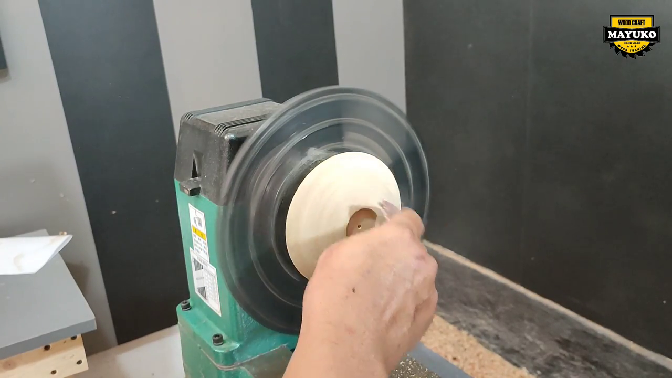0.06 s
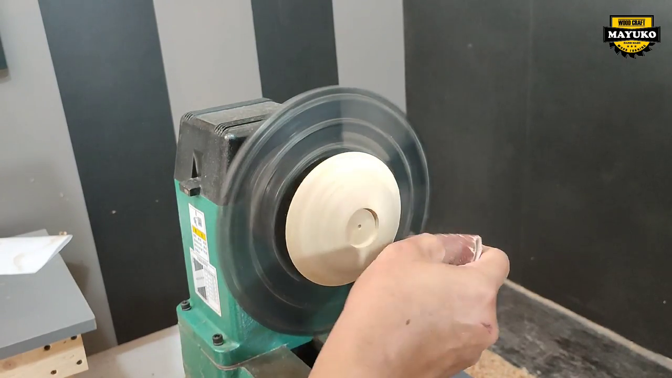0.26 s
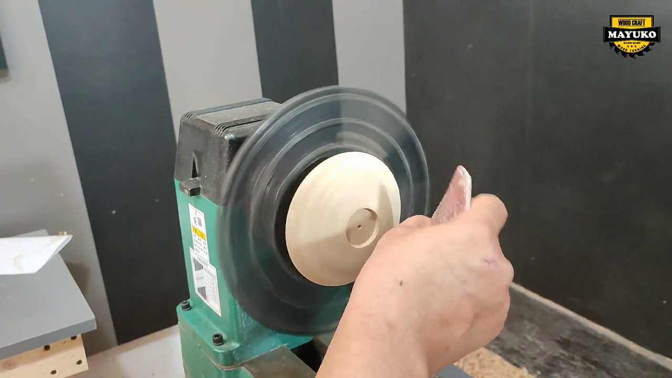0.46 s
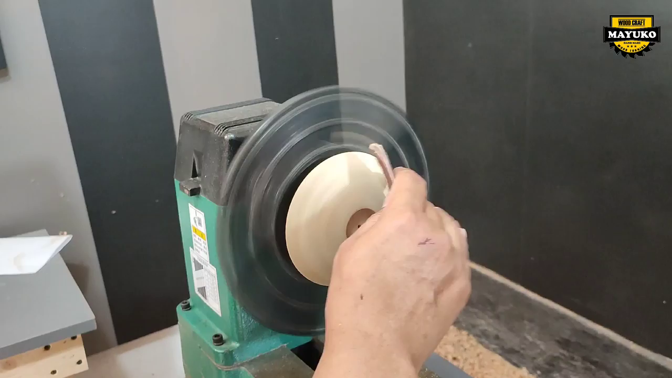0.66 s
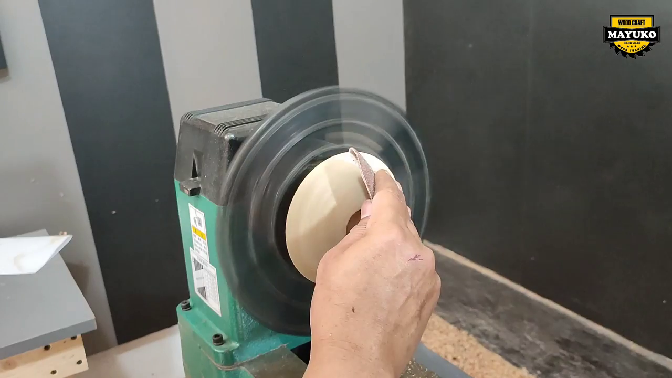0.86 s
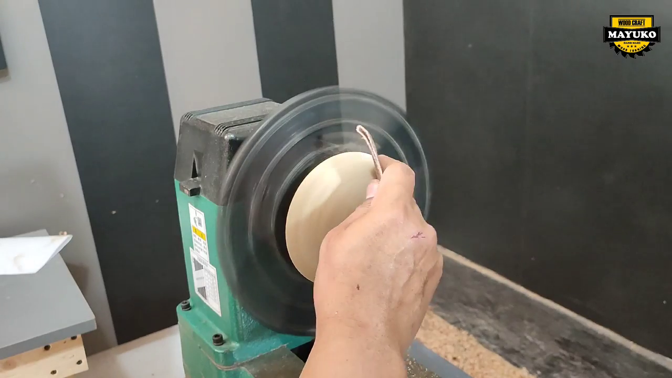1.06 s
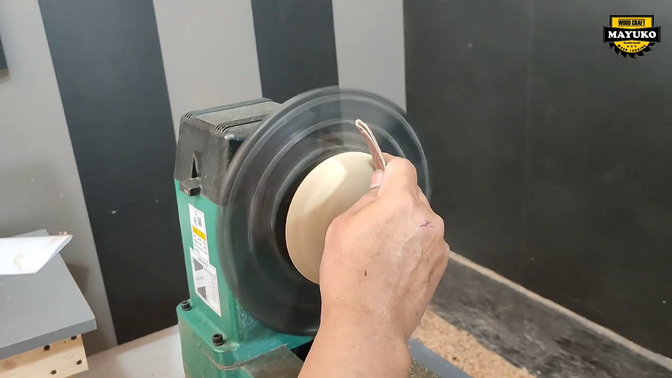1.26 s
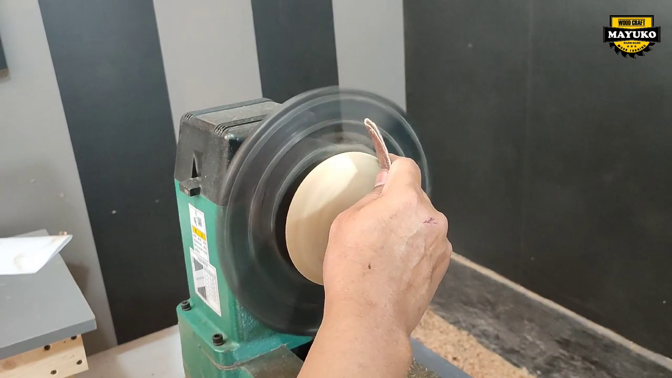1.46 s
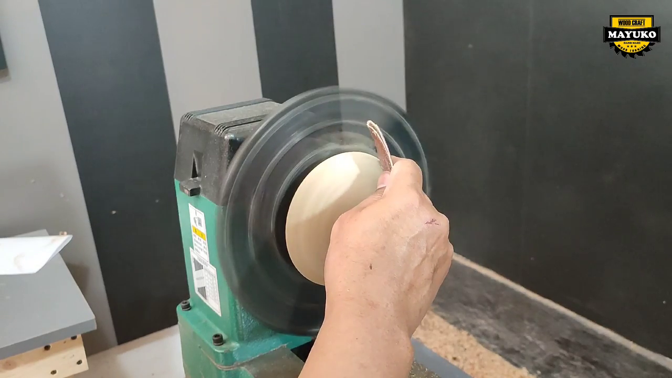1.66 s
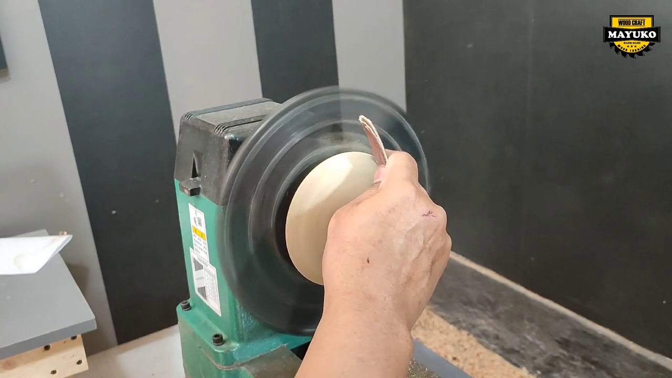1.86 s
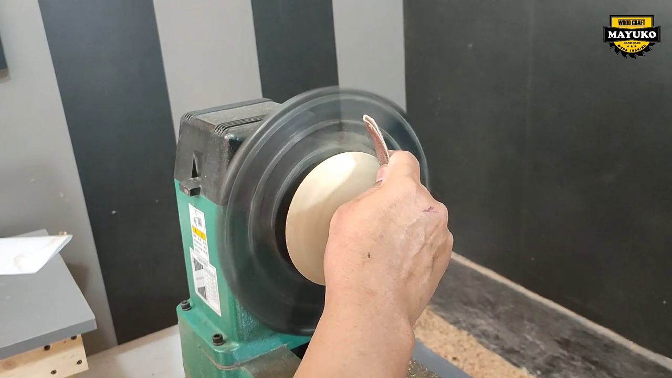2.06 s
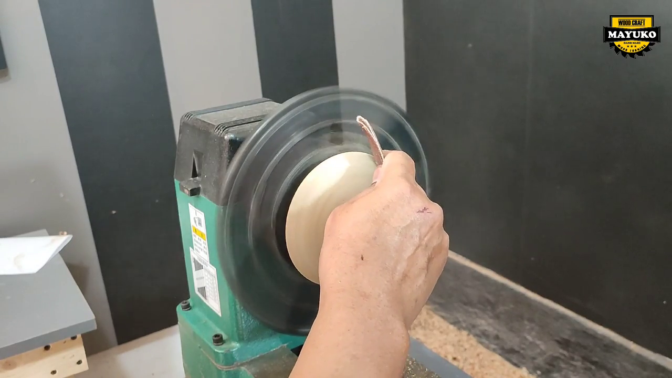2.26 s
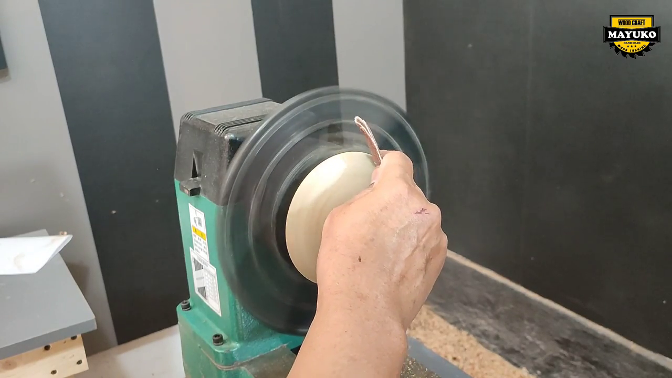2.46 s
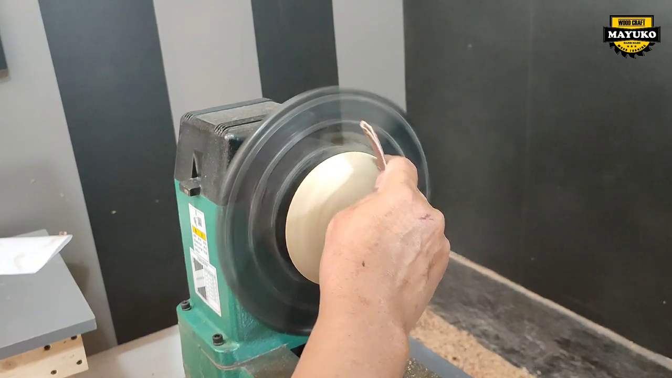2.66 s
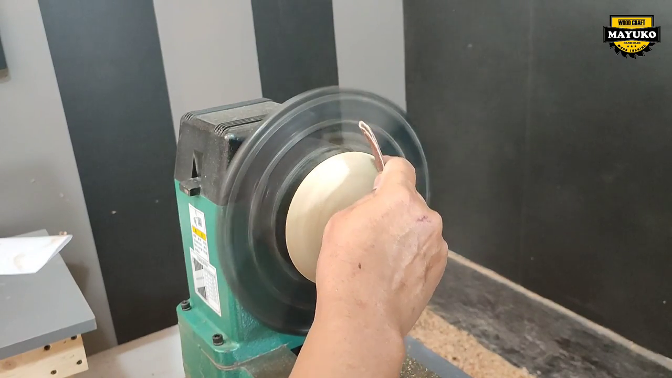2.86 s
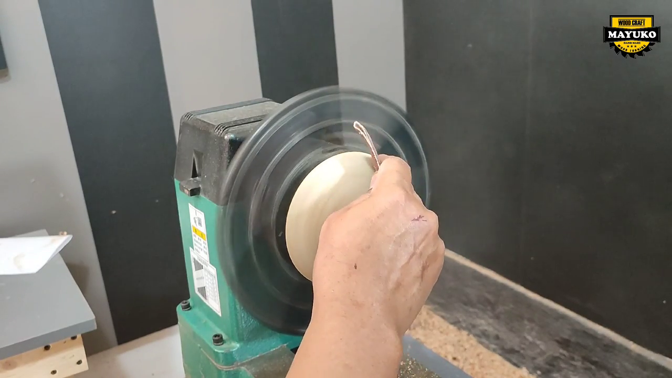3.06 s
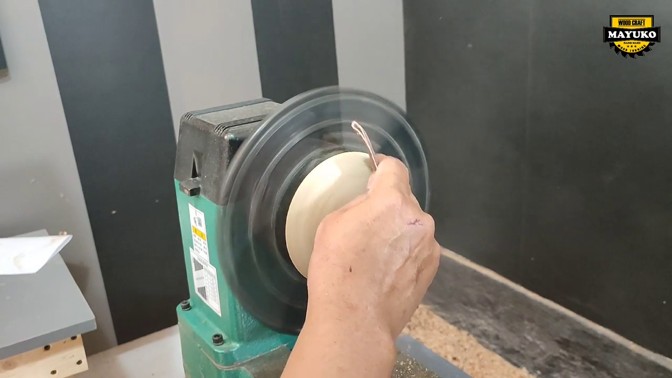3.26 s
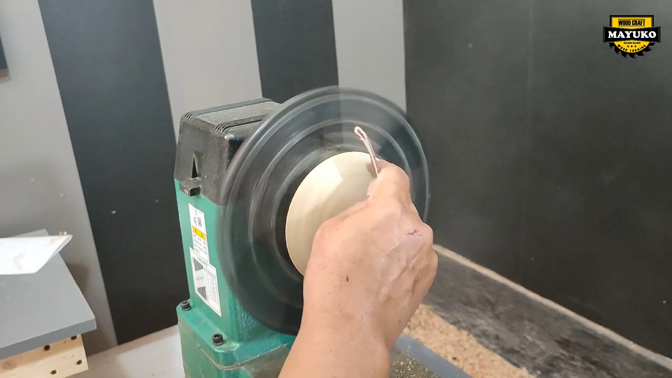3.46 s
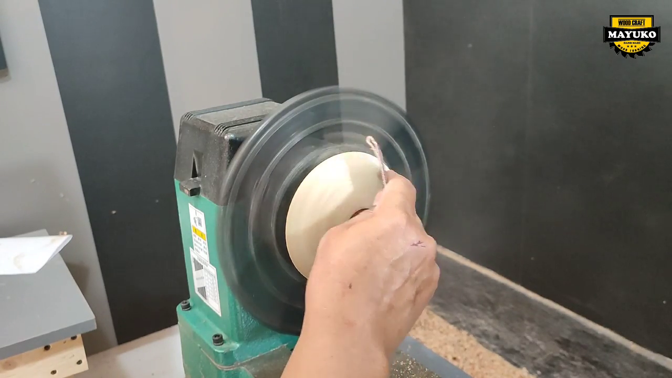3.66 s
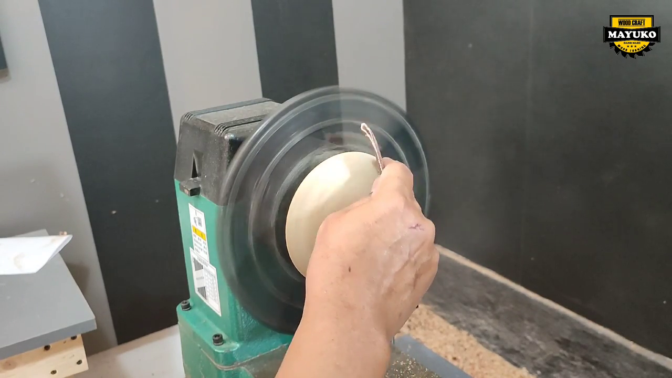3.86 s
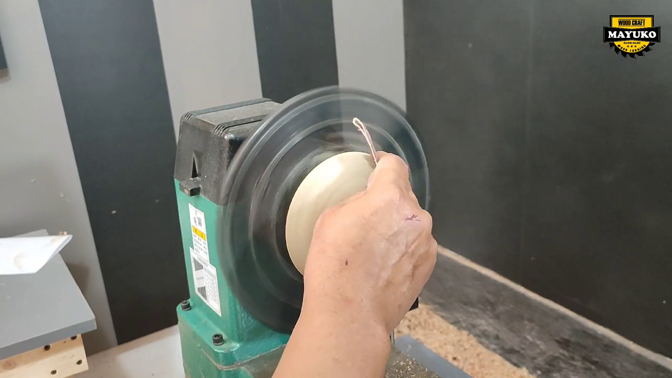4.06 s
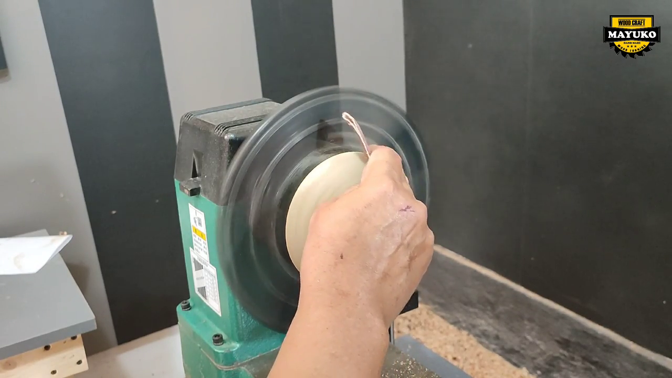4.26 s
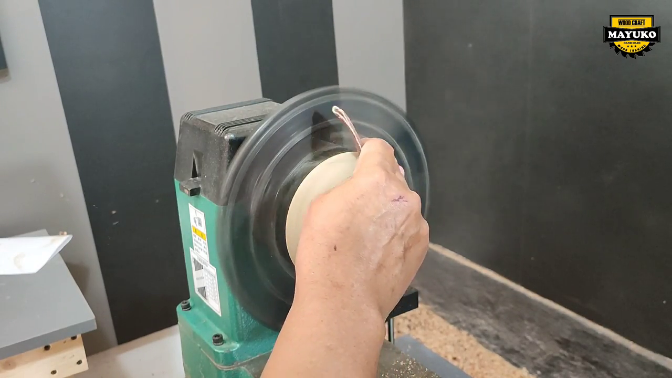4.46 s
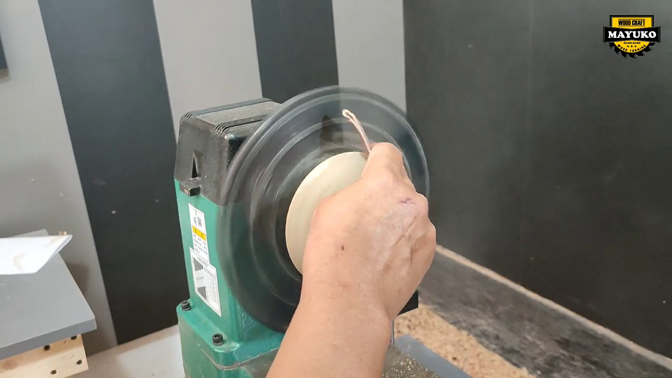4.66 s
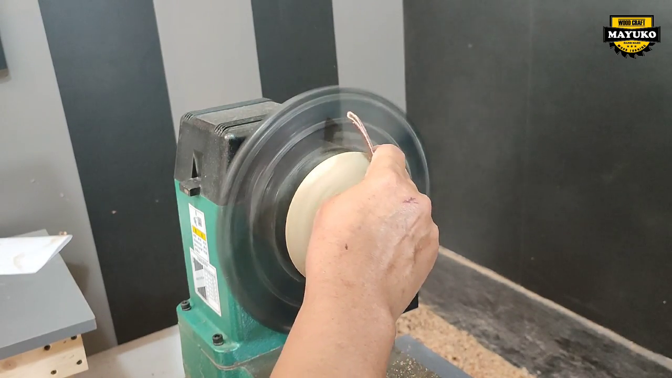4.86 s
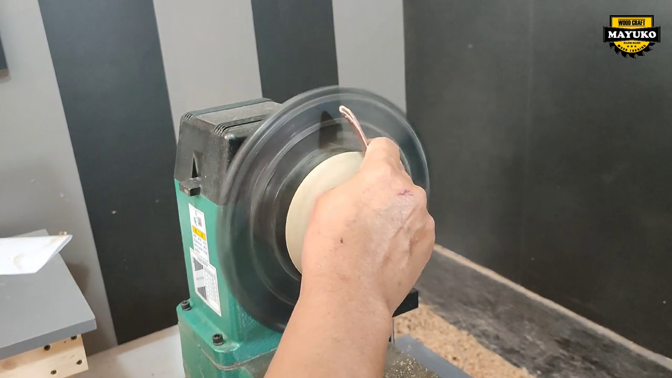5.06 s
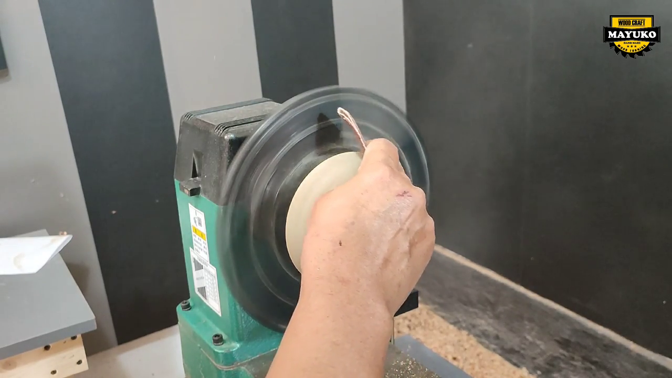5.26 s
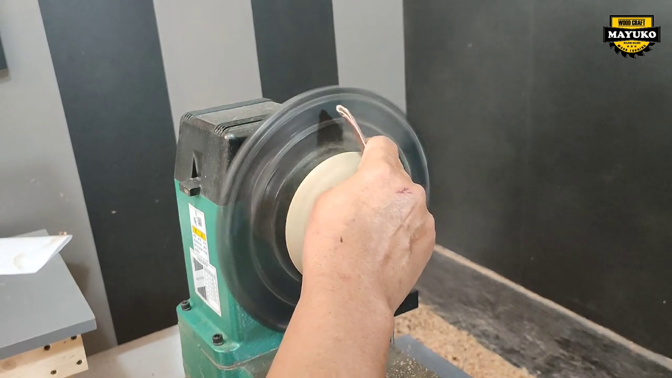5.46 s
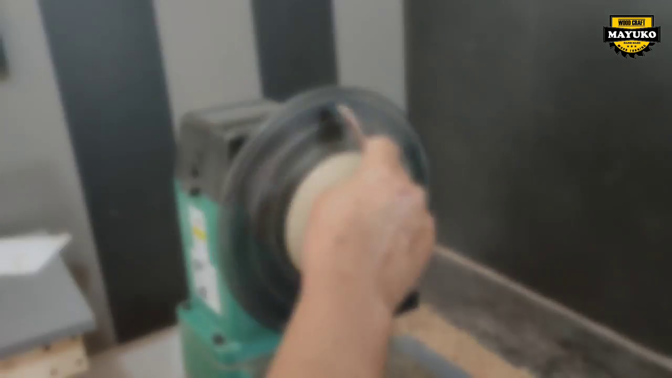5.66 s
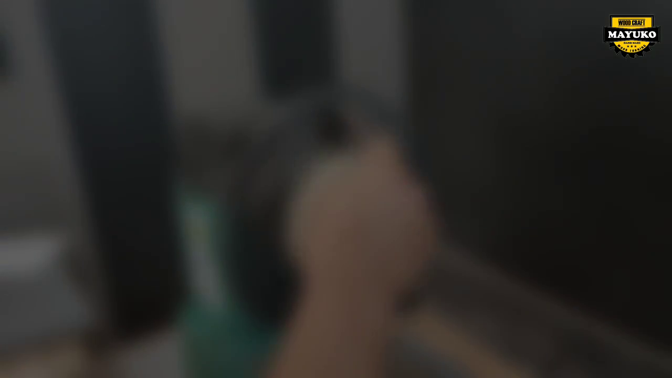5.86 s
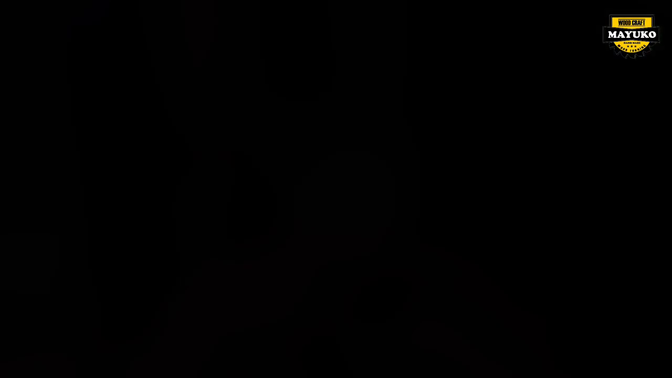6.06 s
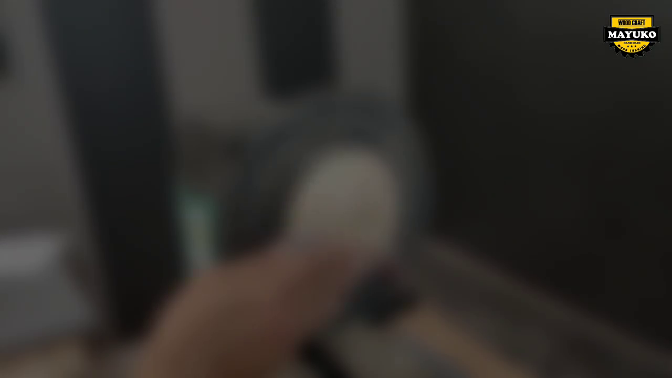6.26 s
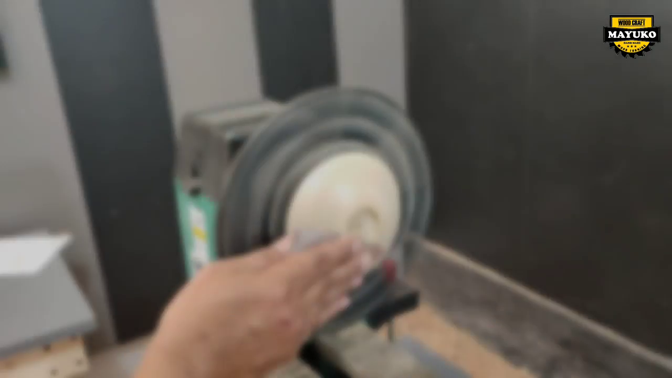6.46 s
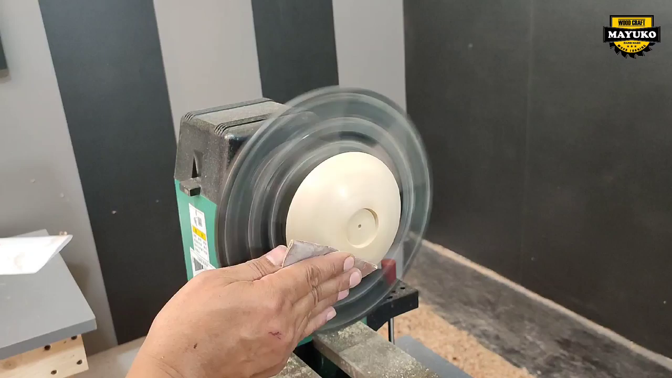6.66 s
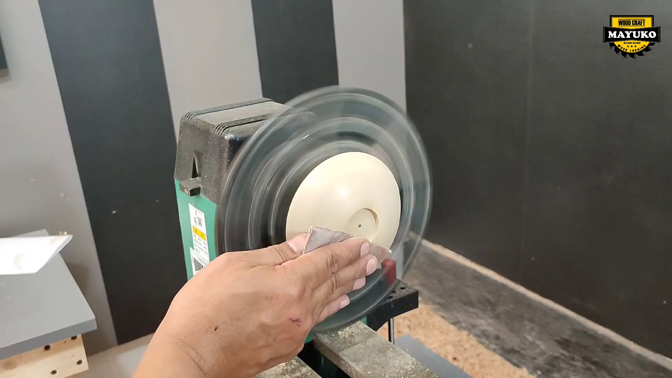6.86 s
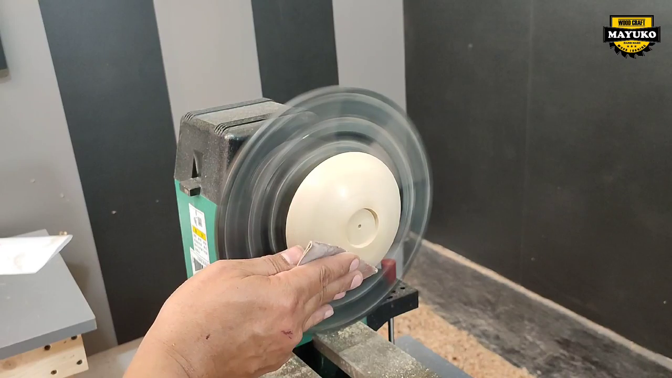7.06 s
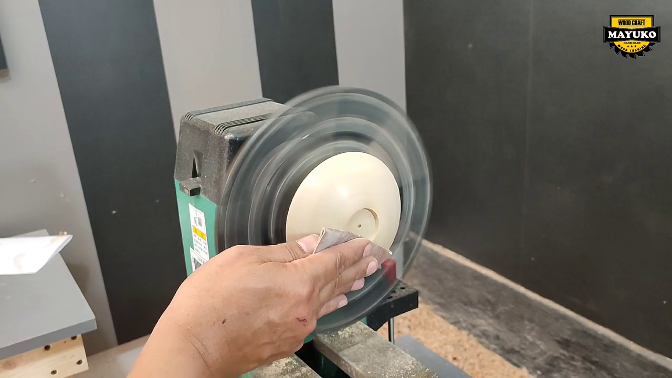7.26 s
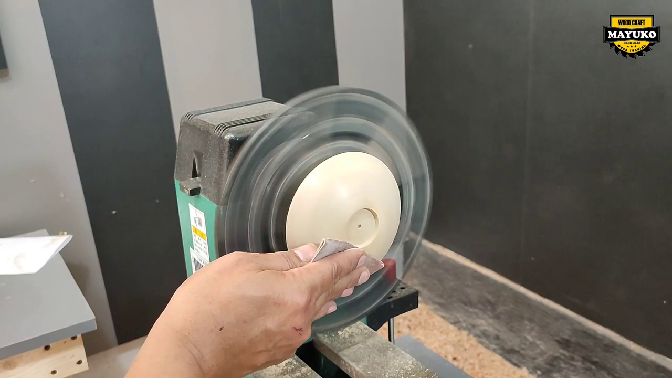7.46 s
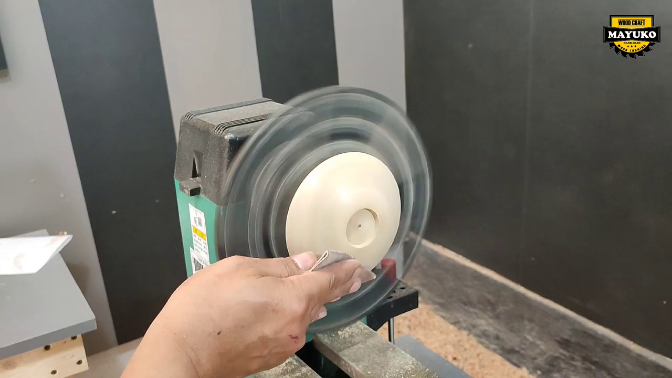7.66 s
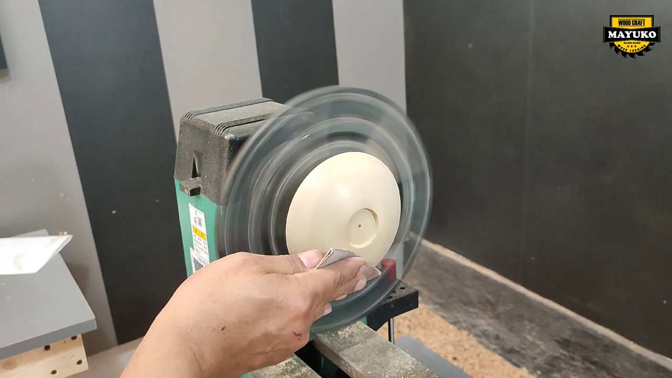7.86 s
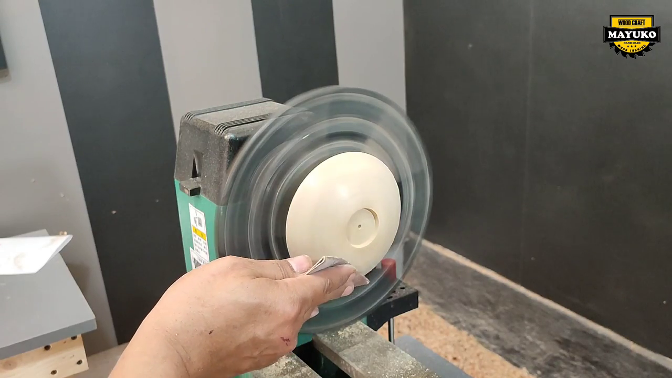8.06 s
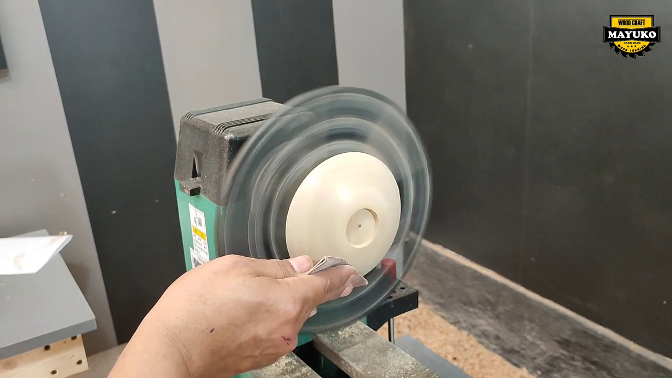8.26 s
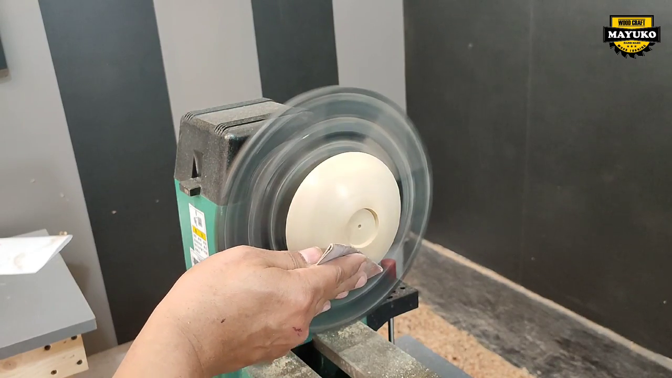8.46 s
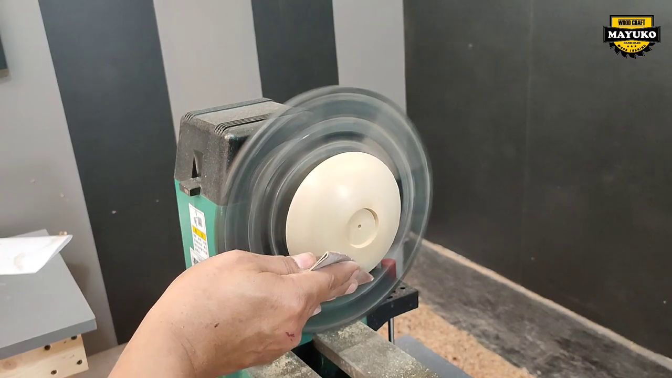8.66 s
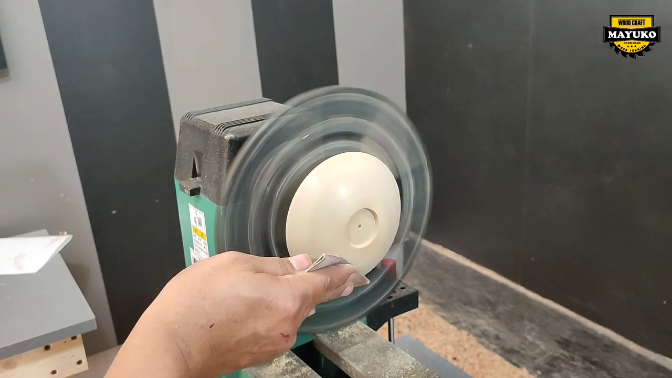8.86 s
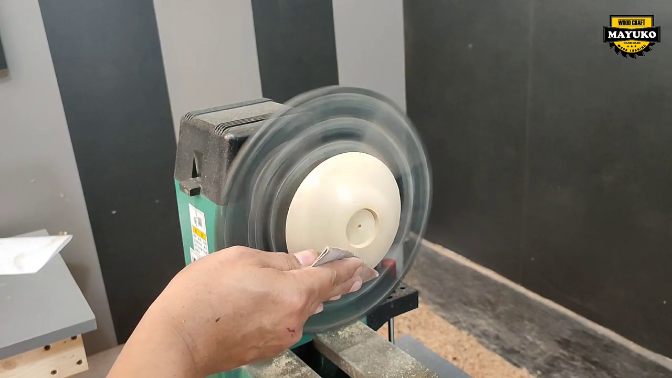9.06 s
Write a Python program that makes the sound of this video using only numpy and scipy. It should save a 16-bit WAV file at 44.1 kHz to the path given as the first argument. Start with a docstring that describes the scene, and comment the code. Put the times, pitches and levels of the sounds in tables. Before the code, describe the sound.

In a small workshop, a wood lathe hums and whirs steadily near the microphone. Coarse paper rasps brightly on the spinning bowl, lifts almost at once for about half a second, then bites again and stays on with a fast pulsing hiss and slight woody ringing. Past six seconds it cuts abruptly to a fine pad brushing very lightly, leaving the motor dominant.

```python
"""Gritty sanding hiss over a humming lathe: coarse paper leaves a spinning wooden bowl, returns and stays on.
After a hard cut a fine pad brushes the same bowl lightly; a small workshop answers, near a camera.
The sanding is noise shaped by the grit, pulsing with each turn, and also sent through two ringing bowl modes.
Motor and belt are steady and wavering tones plus a noisy whir; the draught is low, lumpy noise."""
import sys
import numpy as np
from scipy import signal
from scipy.fft import rfft, irfft, next_fast_len
from scipy.io import wavfile
from scipy.ndimage import uniform_filter1d

SR = 44100
rng = np.random.default_rng(int(sys.argv[2]) if len(sys.argv) > 2 else 0)


def put_to_file(sound):
    """Save the sound as 16-bit audio at rate SR, in the file named by the first command-line argument."""
    columns = np.atleast_2d(sound).T  # one column per channel
    safe = np.clip(columns, -1, 1)
    whole_steps = np.round(safe * 32767)
    wavfile.write(sys.argv[1], SR, whole_steps.astype(np.int16))


def attenuation_scalar(level_db):
    """Turn a level in dB into a linear amplitude multiplier (20 dB per decade)."""
    decades = np.asarray(level_db, float) / 20
    return 10 ** decades


N = 401306

SIZE = next_fast_len(N, True)
HZ = np.fft.rfftfreq(SIZE, 1 / SR)
T = np.arange(N) / SR

# Hiss of the coarse paper. Each row: frequency in Hz, relative level in dB per Hz.
COARSE_HISS = [(2060, -37), (3500, -3), (4720, -6), (5310, -2), (5730, -3), (7240, 1.5), (10600, -7),
               (12000, -4), (13700, -4.5), (14200, -9)]
# Lower skirt of the coarse hiss; it takes the place of the first row above. Each row: Hz, relative dB per Hz.
COARSE_HISS_LOW = [(300, -80), (900, -26), (1300, -36), (1700, -13), (2500, -10.5)]
# Hiss of the fine pad. Each row: frequency in Hz, relative level in dB per Hz.
FINE_HISS = [(300, -60), (900, -29), (1800, -12), (2500, -20), (3100, -7), (6200, -7), (7250, -2),
             (8400, -9.5), (14500, -8)]
# How the hand holds the coarse paper. Each row: time in seconds, pressure as hiss level in dB,
# ringing of the bowl against the hiss in dB, added to RING_DB.
HAND = [(0.0, -26, 8), (0.19, -29, 7), (0.84, -43.5, 18.5), (0.88, -33.5, 9), (0.92, -30.5, 1),
        (0.94, -26, -5.5), (1.25, -29, -0.5), (1.52, -27, 2), (1.68, -25, 2.5), (2.9, -25.5, 6.5),
        (3.05, -27, 6.5), (4.0, -27.5, 7.5), (4.7, -26, 5), (5.3, -26.5, 5), (6.14, -25.5, 5)]
# Ringing modes of the bowl. Each row: frequency in Hz, width in Hz, lag behind the hiss in radians,
# left over right in dB.
BOWL_MODES = [(1942, 79, 0.77, 2.5), (3096, 190, 1.36, -3)]
# End grain passing under the hand. Each row: times a turn, swing in dB, phase in radians.
END_GRAIN = [(1, 1.7, -2.3), (2, .9, 0)]
# How alike left and right are in the rubbing. Each row: frequency in Hz, likeness from -1 to 1.
RUB_LIKENESS = [(1400, -0.12), (1750, 0.57), (2200, 0.81), (3000, 0.14), (3600, 0.034), (5500, -0.12),
                (9000, 0.029), (14500, -0.032)]
# The camera body shades its microphone ports. Each row: frequency in Hz, left over right in dB.
RUB_BALANCE = [(1500, 4), (3500, -2), (7300, -1), (7900, -1.5), (8700, 6), (10000, -1.5), (14500, -1)]
# How fast the workshop echo dies. Each row: frequency in Hz, seconds to fall by 60 dB.
SHOP_DECAY = [(1000, 0.11), (2500, 0.38), (4500, 0.67), (7500, 0.49), (11000, 0.34), (14000, 0.33)]
# The echo is weakest around 2 kHz, where the bowl rings. Each row: frequency in Hz, returned level in dB.
SHOP_RETURN = [(1500, -2), (2200, -4), (3200, -1), (5000, -0.4)]
# Harmonics of the magnetic pull. Each row: multiple of MAINS_HZ, level in dB, left over right in dB,
# radians by which left leads.
MAINS_TONES = [(1, -58.5, -1, 0), (2, -61.5, 5, 0.4), (3, -74, 9, 2.5), (4, -50, -4, 0.5),
               (5, -64, 14, 1.7), (6, -76, 10, 2), (7, -55.5, -2, 0.3)]
# Tones in step with the motor. Each row: multiple of ROTOR_HZ, level in dB, left over right in dB,
# radians by which left leads.
ROTOR_TONES = [(5, -67, 0, 0), (8, -60, 1, .2), (10, -66, 0, .2), (11, -68, 0, .3), (12, -68, 0, .4),
               (13, -57, 3, .5), (19, -62, 7, .2), (20, -65, 2, .2), (22, -62, 7, -1.8),
               (23, -64, -10, 1.2), (24, -62, 2, 1.9), (25, -58, 6, -.5), (26, -61, 8, -1),
               (27, -57, 12, -2.6), (28, -61, 5, .4), (29, -67, 10, .5), (30, -69, 5, .8),
               (31, -69, 5, 1.3), (32, -69, 3, 1), (33, -68, 3, 1), (34, -69, 3, 1), (44, -67, 7, 1.7),
               (46, -69, 1, .9)]
# Spindle, belt and bearing tones. Each row: frequency in Hz before any slowing, level in dB,
# steady share of the power from 0 to 1, left over right in dB, radians by which left leads.
DRIVE_TONES = [(29.7, -62, .6, 15, 2), (60, -69, .4, 12, -.6), (217, -68, .3, 1, 0), (231, -64, .3, 0, -.1),
               (332.2, -50, .75, 4, .6), (346.5, -52, .7, -2, .3), (351, -53.5, .3, -2, .3),
               (360, -64, .6, 4, 0), (370.6, -63, .5, 6, .1), (383, -66, .2, 1, .1),
               (442.6, -58, .7, 2, .6), (513, -63, .3, 2, .8), (676, -61, .5, 10, -2), (978, -70, .3, 1, 1),
               (1216, -65, .6, 7, -1.1), (1231, -68, .6, 5, -1.3), (1333, -69, .4, 3, 0),
               (1479, -65, .5, 10, -.8)]
# Whir of fan and bearings. Each row: frequency in Hz, level in dB per Hz.
WHIR = [(40, -84), (100, -83.5), (220, -79.5), (340, -79.5), (420, -79), (550, -77.5), (800, -82.5),
        (1500, -80.5), (2100, -88.5), (3500, -98.5), (5000, -99), (8000, -106), (14500, -112)]
# How alike left and right are in the whir. Each row: frequency in Hz, likeness from -1 to 1.
WHIR_LIKENESS = [(60, .85), (200, .9), (450, .75), (800, .35), (1500, .2), (3500, .15), (6000, -.05)]
# The motor housing rings in the whir. Each row: frequency in Hz, width in Hz, peak in dB per Hz.
HOUSING = [(2470, 64, -80), (2980, 140, -87)]

LIFT_S, PRESS_S, CUT_S = 0.19, 0.84, 6.1352  # paper leaves, paper returns, fine pad takes over
PAD_DB, PAD_RING_DB = -50.5, -12  # the fine pad's hiss, and the bowl's ringing against it, added to RING_DB
PAD_EASES_S, PAD_EASES_DB = 7.8, -1.0  # when the pad's level steps, and by how much
SPIN_HZ = 29.88  # bowl turns a second
RING_DB = (-22, -19)  # each bowl mode against the hiss, before what the hand or pad adds
RING_GRAIN = 1  # extra share of the end-grain swing that the ringing gets
RING_WAVER_DB, RING_WAVER_HZ = 2, 11  # the contact spot creeps over the nodes of each mode
MAINS_HZ = 100.07  # magnetic pull, twice the supply
ROTOR_HZ = 24.83  # motor turns a second, before any slowing
ROTOR_BLUR_HZ, ROTOR_STEADY = 4.5, .2  # blur of the rotor tones and the steady share of their power
DRIVE_BLUR_HZ = 3.5
SAG = .0022  # share of speed lost throughout the coarse sanding part
DRAUGHT_DB, DRAUGHT_PRESSED_DB, DRAUGHT_LAG_S = -58.0, 7.0, .8  # base level, rise, time to rise
GUST_DB, GUST_HZ = 2, 3.4
EDGE_HZ = 14270  # upper limit of the band


def evened(x):
    """Scale a signal to an rms of 1."""
    return x / np.sqrt(np.mean(abs(x) ** 2) + 1e-30)


def read(points, hz):
    """Read a two-column table at any frequency, on a logarithmic scale."""
    f, value = np.transpose(points)
    return np.interp(np.log(hz + 1), np.log(f + 1), value)


def colour(x, response):
    """Filter a sound by multiplying its spectrum."""
    return irfft(rfft(x, SIZE) * response, SIZE)[..., :N]


def sides(db, lead):
    """Left and right factors for a level and phase difference, half on each side."""
    level = attenuation_scalar(np.multiply.outer([.5, -.5], db))
    return level * np.exp(1j * np.multiply.outer([.5, -.5], lead))


def pair(first, second, likeness):
    """Two channels that agree by a share that depends on frequency."""
    same = np.clip(read(likeness, HZ), -1, 1)
    right = colour(first, same) + colour(second, np.sqrt(1 - same ** 2))
    return np.array([first, right])


def wander(hz):
    """Slow random complex drift of rms about 1; a higher hz makes it quicker."""
    z = rng.standard_normal((N // 512 + 2, 2)) @ [1, 1j]
    f = np.fft.fftfreq(len(z), 512 / SR)
    z = evened(np.fft.ifft(np.fft.fft(z) / (1 + (2 * f / hz) ** 2)))
    return np.interp(np.arange(N) / 512, np.arange(len(z)), z)


def sanding(hiss_db, added_ring_db, touching, spectrum, scratch_db, patch_db, flicker_db):
    """Grit tears the wood in tiny uneven ticks: heard directly as hiss and through the ringing bowl."""
    turn_db = sum(db * np.cos(2 * np.pi * k * SPIN_HZ * T + phase) for k, db, phase in END_GRAIN)
    unevenness = np.minimum(rng.exponential(size=(2, N)), 5)
    ticks = evened(rng.standard_normal((2, N)) * attenuation_scalar(scratch_db * unevenness))
    grit = evened(patchy(pair(*ticks, RUB_LIKENESS), patch_db, flicker_db))
    force = grit * touching * attenuation_scalar(hiss_db + turn_db)
    hiss = attenuation_scalar(read(spectrum, HZ)) * sides(read(RUB_BALANCE, HZ), 0 * HZ)
    out = colour(force, evened(hiss))
    for (hz, width, lag, pan_db), db in zip(BOWL_MODES, RING_DB):
        # the ringing opposes the hiss above its peak, so a dip follows
        mode = np.minimum(HZ / hz, 1) * np.exp(-1j * lag) / (1 + 2j * (HZ - hz) / width)
        waver_db = RING_WAVER_DB * np.sqrt(2) * wander(RING_WAVER_HZ).real
        ring_db = db + added_ring_db + RING_GRAIN * turn_db + waver_db
        out += colour(force * attenuation_scalar(ring_db), evened(mode) * sides(pan_db, 0)[:, None])
    return out


def patchy(x, patch_db, flicker_db):
    """The contact shifts under the fingers: patches of the spectrum swell and sink, the whole flickers."""
    z = signal.stft(x, nperseg=256, noverlap=192)[2]
    field = uniform_filter1d(rng.standard_normal(z.shape[1:]), size=3, axis=0)
    patches = evened(uniform_filter1d(field, size=40, axis=1))
    flicker = evened(uniform_filter1d(rng.standard_normal(z.shape[2]), size=30))
    z = z * attenuation_scalar(patch_db * patches + flicker_db * flicker)
    return signal.istft(z, nperseg=256, noverlap=192)[1][:, :N]


def shop(x, wet_db):
    """The walls return a hiss as fresh noise whose power trails the source, each band dying at its own speed."""
    hz, _, z = signal.stft(x, SR, nperseg=1024, noverlap=768)
    keep = attenuation_scalar(-120 * 256 / SR / read(SHOP_DECAY, hz))  # share of power left after one frame
    power = abs(z) ** 2
    for k in range(1, z.shape[2]):
        power[..., k] = keep * power[..., k - 1] + (1 - keep) * power[..., k]
    noise = pair(*rng.standard_normal((2, N)), RUB_LIKENESS)
    fresh = evened(signal.stft(noise, nperseg=1024, noverlap=768)[2])
    late = np.roll(np.sqrt(power), shift=2, axis=2)  # two frames later
    late = late * attenuation_scalar(read(SHOP_RETURN, hz))[:, None]
    echo = signal.istft(late * fresh, nperseg=1024, noverlap=768)[1][:, :N]
    return x + attenuation_scalar(wet_db) * echo


def place(tone, db, pan_db, lead):
    """Put a complex tone between left and right; db sets its level."""
    return np.sqrt(2) * attenuation_scalar(db) * np.outer(sides(pan_db, lead), tone).real


def motor():
    """Supply harmonics hold their pitch, blurred rotor and drive tones run slower until the cut, and air whirs."""
    out = np.zeros((2, N))
    for k, db, pan_db, lead in MAINS_TONES:
        tone = (1 + .13 * wander(4)) * np.exp(2j * np.pi * (k * MAINS_HZ * T + rng.random()))
        out += place(tone, db, pan_db, lead)
    running = np.cumsum(1 - SAG * (T < CUT_S)) / SR  # time as the turning parts count it
    tones = [(k * ROTOR_HZ, db, ROTOR_BLUR_HZ, ROTOR_STEADY, pan_db, lead)
             for k, db, pan_db, lead in ROTOR_TONES]
    tones += [(hz, db, DRIVE_BLUR_HZ, steady, pan_db, lead)
              for hz, db, steady, pan_db, lead in DRIVE_TONES]
    for hz, db, blur_hz, steady, pan_db, lead in tones:
        size = np.sqrt(steady) + np.sqrt(1 - steady) * wander(blur_hz)
        tone = size * np.exp(2j * np.pi * (hz * running + rng.random()))
        out += place(tone, db, pan_db, lead)
    return out + whir()


def whir():
    """Fan and bearings make a broad noise in which the motor housing rings."""
    power = attenuation_scalar(2 * read(WHIR, HZ))
    for hz, width, db in HOUSING:
        power += attenuation_scalar(2 * db) / (1 + (2 * (HZ - hz) / width) ** 2)
    noise = pair(*rng.standard_normal((2, N)), WHIR_LIKENESS)
    return colour(noise, np.sqrt(power * SR / 2))


def draught():
    """Lumpy air off the chuck; a hand pressing coarse paper on the bowl turns more of it to the microphone ports."""
    air = rng.standard_normal((2, N))
    rumble = HZ / (HZ + 6) / (1 + (HZ / 42) ** 2.6)
    air = evened(colour(air + .3 * air[::-1], rumble))
    held = np.clip((T - PRESS_S) / DRAUGHT_LAG_S, 0, 1) * (T < CUT_S)
    gust_db = GUST_DB * np.sqrt(2) * wander(GUST_HZ).real
    level_db = DRAUGHT_DB + DRAUGHT_PRESSED_DB * held + gust_db
    return air * attenuation_scalar(level_db + np.array([[3], [-3]]))  # stronger on the left


def scene():
    """Coarse sanding, then fine after the cut, over the motor and the draught."""
    s, pressure_db, hand_ring_db = np.transpose(HAND)
    touching = (T <= LIFT_S) | (T >= PRESS_S)
    coarse = sanding(np.interp(T, s, pressure_db), np.interp(T, s, hand_ring_db), touching,
                     COARSE_HISS_LOW + COARSE_HISS[1:], scratch_db=0.75, patch_db=0.87, flicker_db=1.06)
    pad_db = PAD_DB + PAD_EASES_DB * (T > PAD_EASES_S)
    fine = sanding(pad_db, PAD_RING_DB, T >= CUT_S, FINE_HISS, scratch_db=.8, patch_db=.7, flicker_db=.35)
    rubbing = np.where(T < CUT_S, shop(coarse, wet_db=-0.05), shop(fine, wet_db=1.5))
    return rubbing + motor() + draught()


def band_limit(x):
    """A steep low-pass at the top of the band."""
    return signal.sosfilt(signal.butter(12, 15540, fs=SR, output="sos"), x)


def record(dry):
    """A steep filter removes the highest treble from the mix."""
    edge = signal.firwin(511, EDGE_HZ, window=("kaiser", 9), fs=SR)
    mix = signal.oaconvolve(dry, edge[None], "same")
    return band_limit(mix)


dry = scene()
out = record(dry)
put_to_file(out)
```